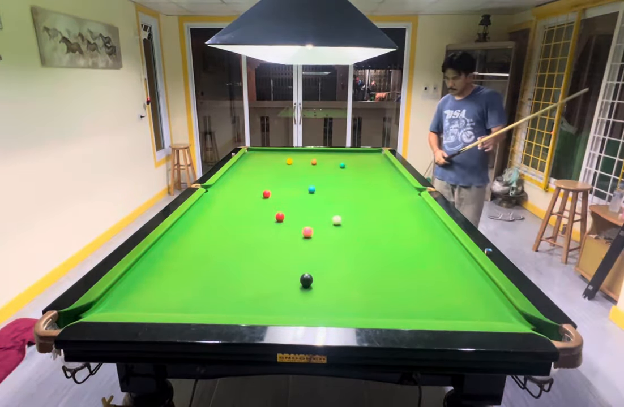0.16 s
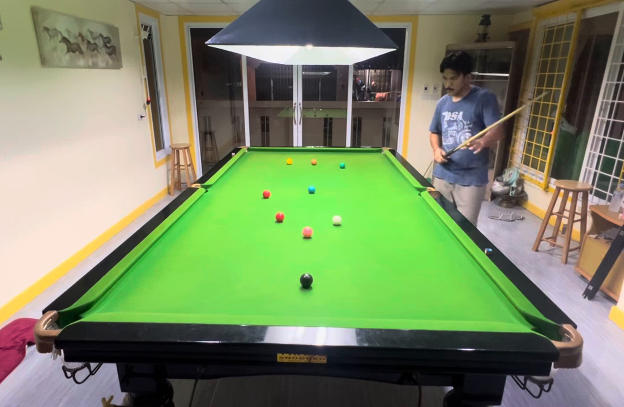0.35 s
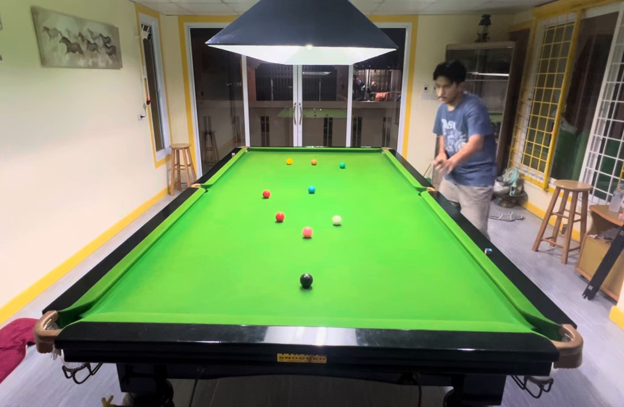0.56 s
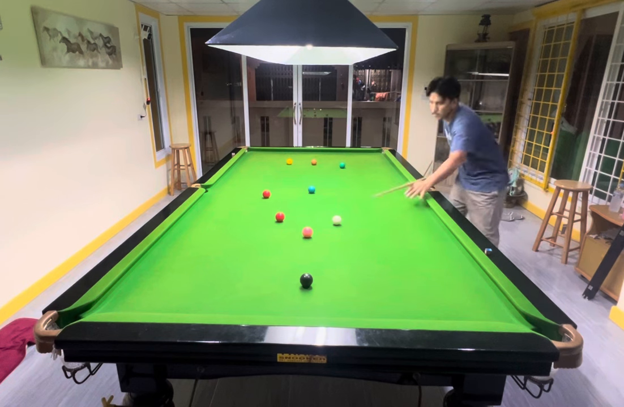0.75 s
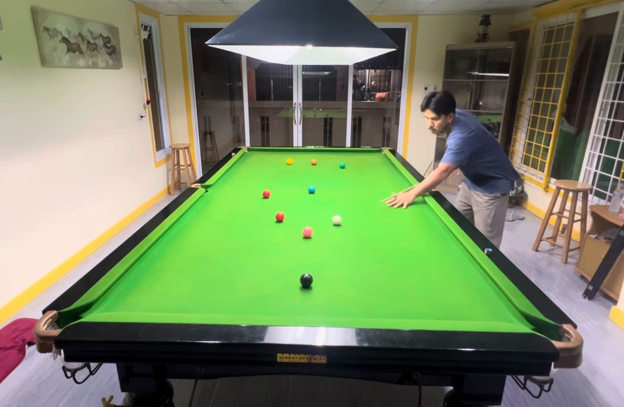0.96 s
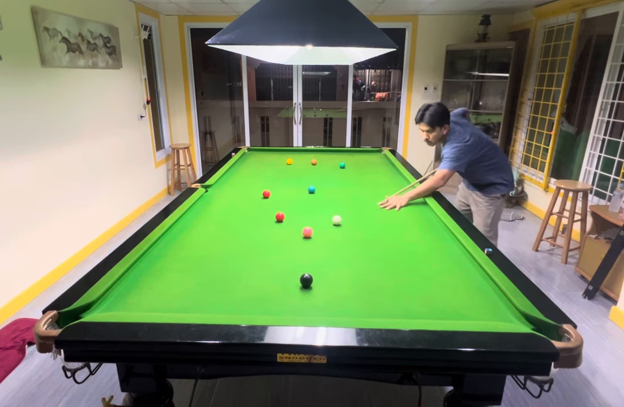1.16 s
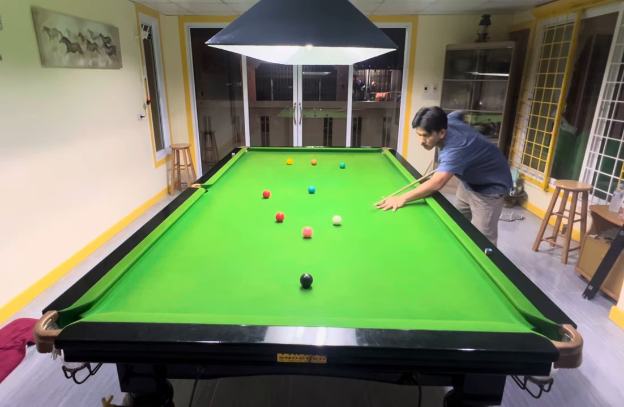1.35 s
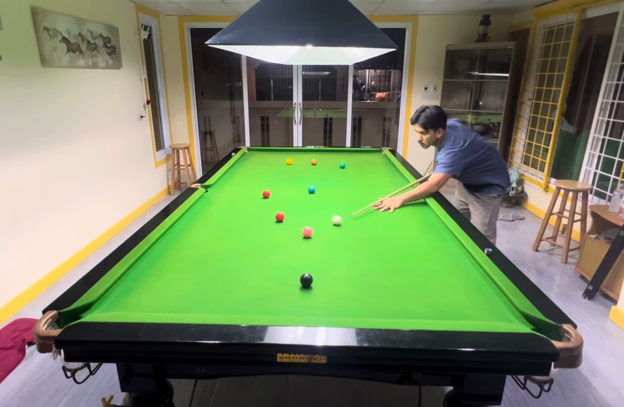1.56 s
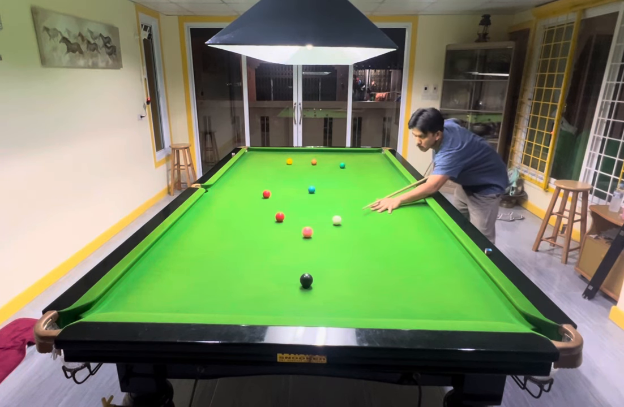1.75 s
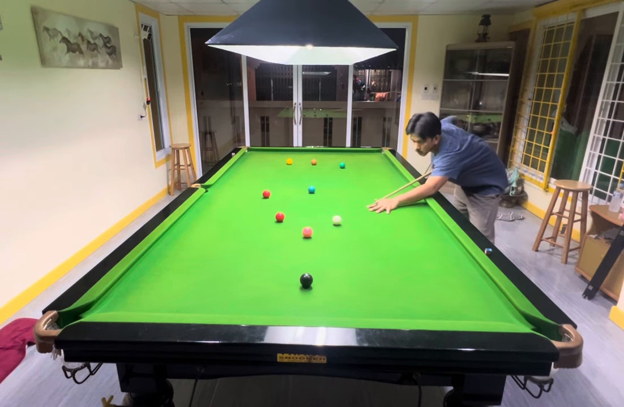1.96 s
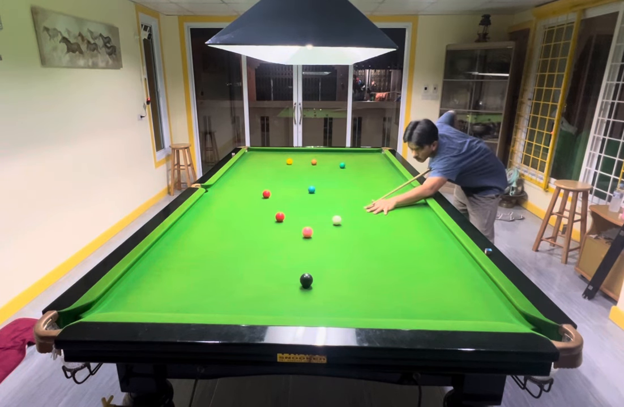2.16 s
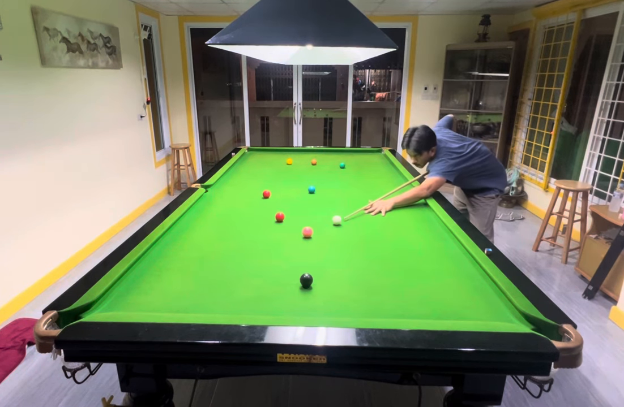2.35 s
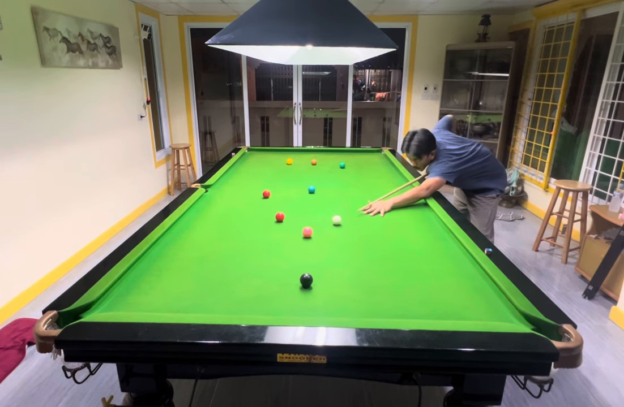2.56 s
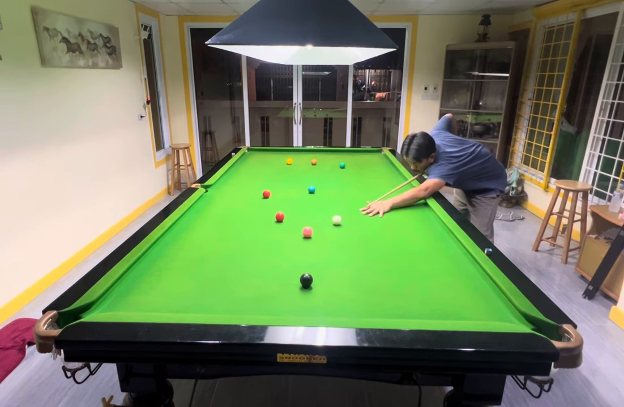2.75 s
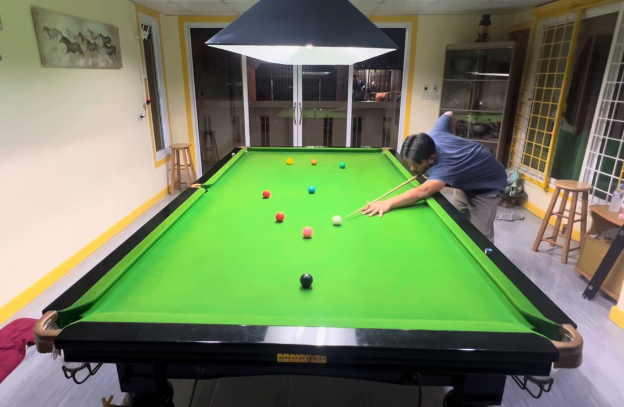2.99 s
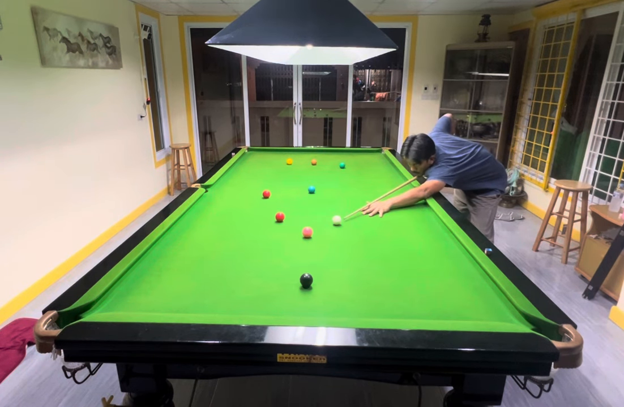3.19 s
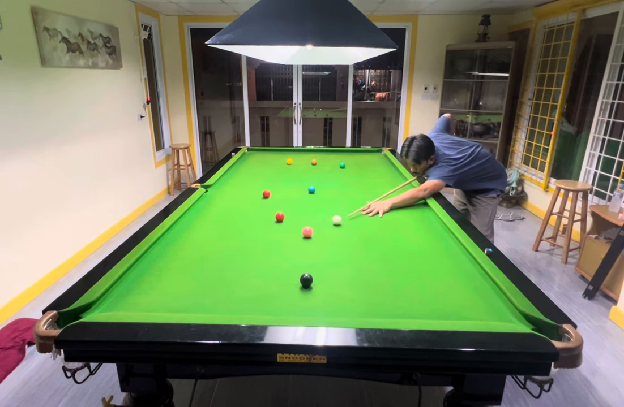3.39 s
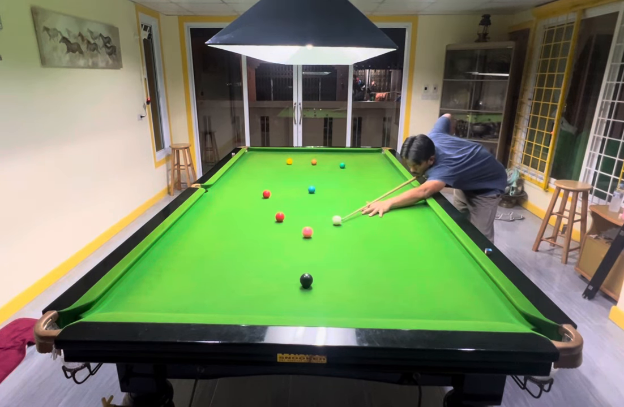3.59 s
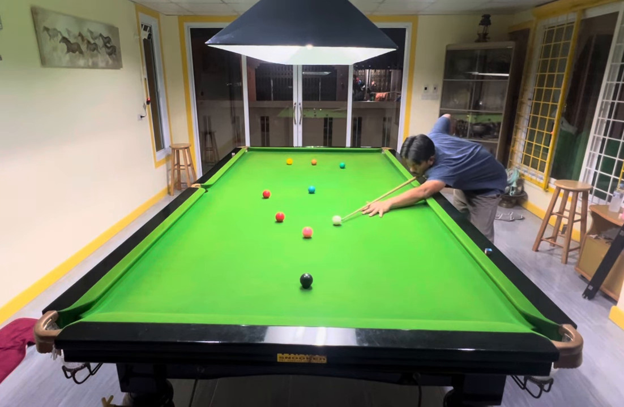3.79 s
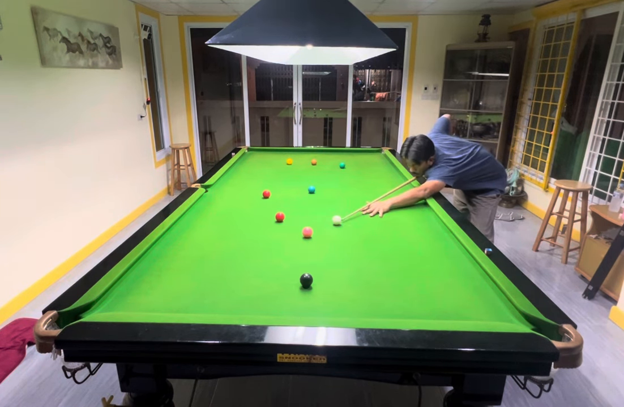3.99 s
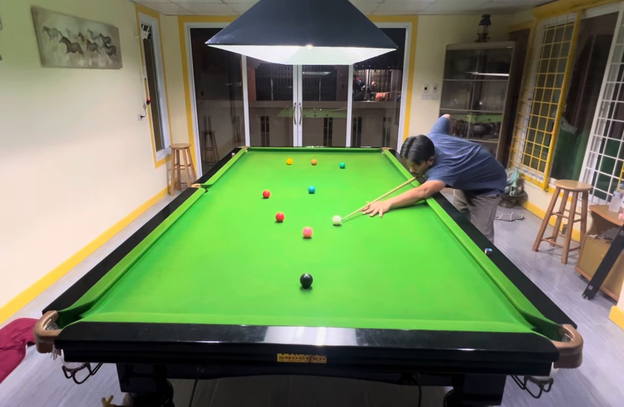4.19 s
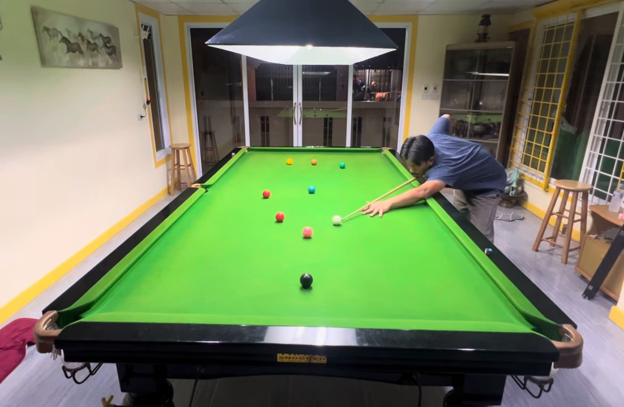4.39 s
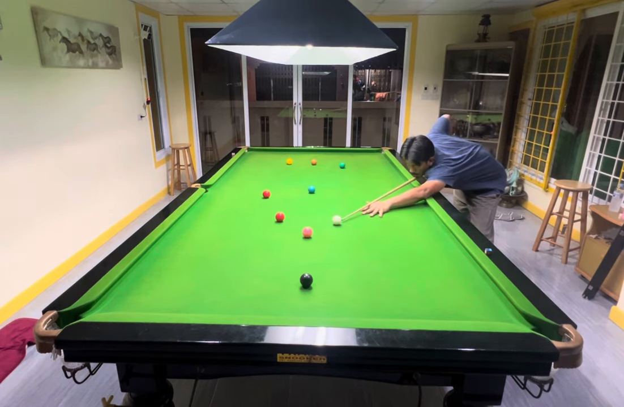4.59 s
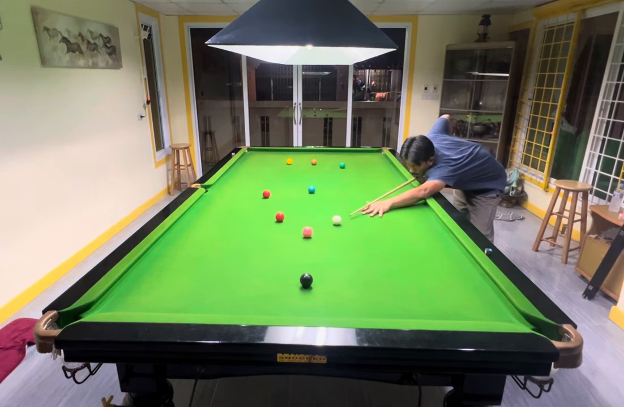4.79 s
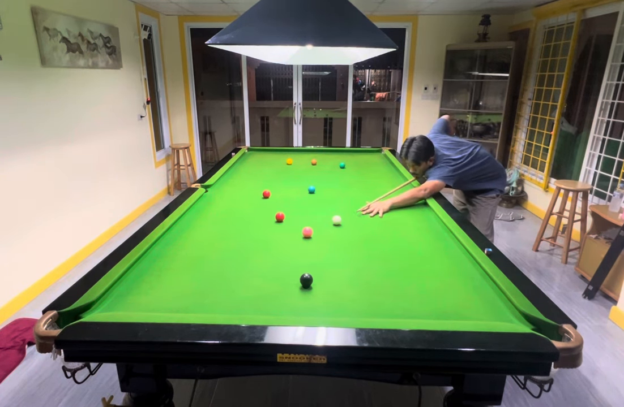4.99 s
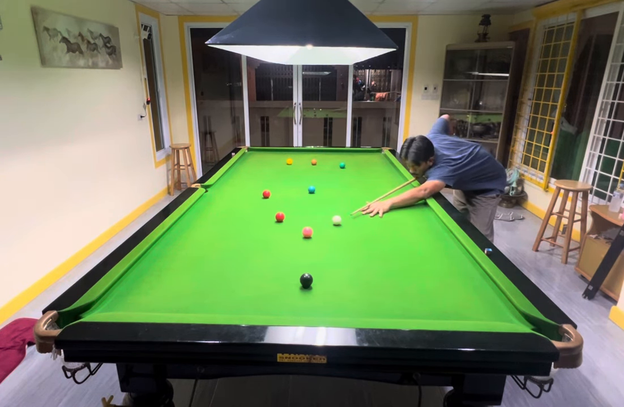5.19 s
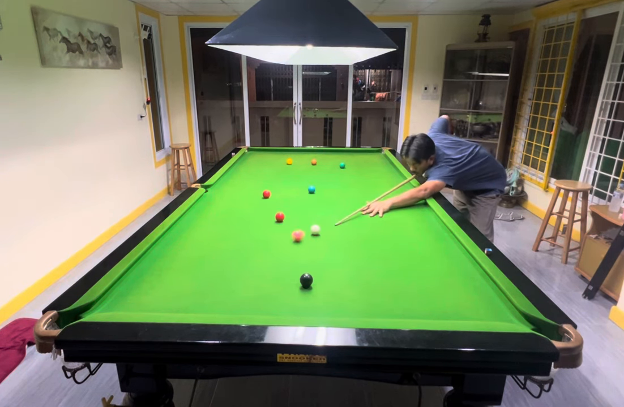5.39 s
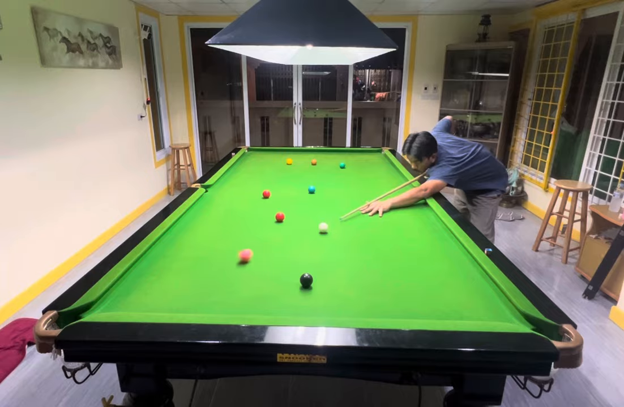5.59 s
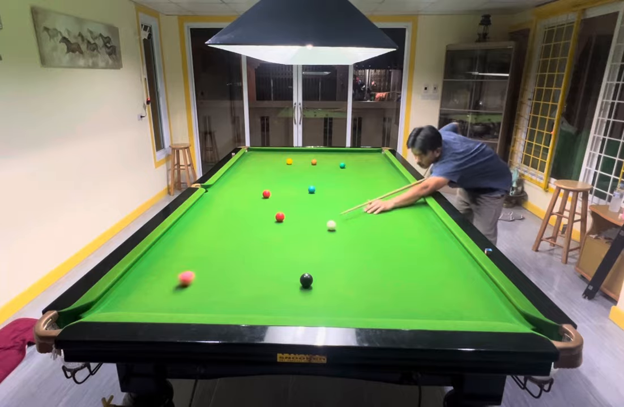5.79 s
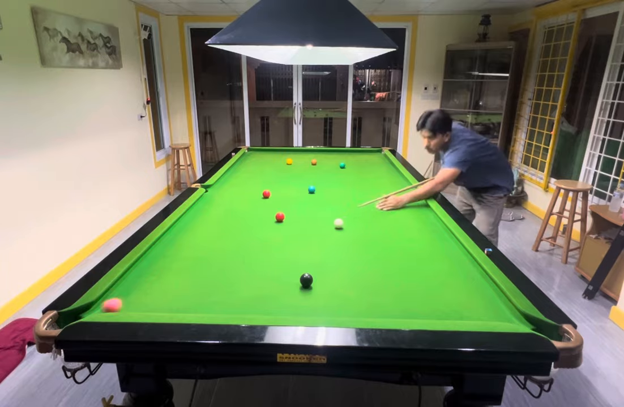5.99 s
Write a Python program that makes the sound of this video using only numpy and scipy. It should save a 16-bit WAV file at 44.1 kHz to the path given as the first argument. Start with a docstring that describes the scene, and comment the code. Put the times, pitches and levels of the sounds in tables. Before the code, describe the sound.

Throughout the six seconds or so, a cooling unit makes a quiet, steady low hum with a smooth rush of air. Its fan grazes the housing, giving faint, quick, uneven ticks, most noticeable in the first two seconds and again from about 3.3 to 5 seconds. A player's clothes rustle very faintly around 0.7, 1.4 and 2.1 seconds. At about 5.3 seconds a cue strikes the white ball with a soft, short wooden knock. A tenth of a second later that ball hits another with a single sharp, bright click, by far the loudest sound, slightly left of centre. The stereo microphone picks up quick echoes from the hard walls of the billiard room and a tail that dies away in a little over half a second. Another faint clothing rustle comes near 6 seconds as the hum continues.

```python
"""A cue strikes the white ball, which clicks against another ball, in a hard-walled billiard room.
Each blow is a short pressure pulse, and the wooden shaft rings after the first. Both reach the stereo
microphone directly, then as early echoes and a diffuse tail. In the background a cooling unit hums
(rotor orders, mains buzz) and blows air, its fan grazing the housing once a turn, now and then firmly
enough to tick. A faint treble rustle comes and goes as the player moves."""
import sys
import numpy as np
from scipy import signal
from scipy.fft import rfft, irfft
from scipy.io import wavfile
from scipy.ndimage import uniform_filter1d

SR = 44100
rng = np.random.default_rng(int(sys.argv[2]) if len(sys.argv) > 2 else 0)


def store_pcm(level_fs):
    """Save levels as 16-bit WAV."""
    pcm = np.round(np.clip(level_fs, -1, 1) * 32767).astype(np.int16)
    wavfile.write(sys.argv[1], SR, np.atleast_2d(pcm).T)


N = 266584
SECONDS, FREQS = np.arange(N) / SR, np.fft.rfftfreq(N, 1 / SR)
SPLIT = np.array([[.5], [-.5]])   # shares a left-minus-right amount between the two sides
TAIL_DB = -26.8   # gain of the room's tail


def cue_strike():
    """The leather tip hits the white ball; the shaft knocks on the bridge hand, rings and shudders."""
    # the blow: t/s, level/dB, left minus right/dB, right lag/ms
    strike = (5.2695, -27, -2.0, .03)
    # its spectrum: f/Hz, level/dB
    colour = [(150, -38), (300, -11), (600, -11), (900, -6), (1400, -1.0), (2300, 0.0), (3300, -4),
              (5200, -13), (7500, -20), (10000, -35), (13500, -48), (15300, -30)]
    start, peak_db, pan_db, lag_ms = strike
    tip = pulse(start, peak_db, colour, width_ms=1.5)
    knock = pulse(start + .003, peak_db=-21, colour=colour, width_ms=.8)
    shudder_db, shudder_t60_s, rise_s = -25.5, .055, .003
    age = np.maximum(SECONDS - start, 0)
    envelope = np.minimum(age / rise_s, 1) * from_db(shudder_db - 60 * age / shudder_t60_s)
    shudder = envelope * rms_one(stereo_noise(from_db(at_hz(colour, FREQS)), N)[0])
    sound = tip + knock + shaft_ring(start - .0008) + shudder
    return at_microphone(sound, pan_db, lag_ms, TAIL_DB + 3)


def shaft_ring(start):
    """The wooden shaft rings briefly; a thin rod radiates no bass, and the leather softens the top."""
    # shaft modes: f/Hz, level/dB, t60/s
    modes = [(350, -29.5, .016), (690, -40, .014), (950, -23, .0065), (1310, -33, .02), (1620, -34, .02),
             (2300, -32, .015)]
    click = np.zeros(N)
    click[round(start * SR)] = 1
    ringing = sum(from_db(level_db) * ring(click, hz, t60) for hz, level_db, t60 in modes)
    return signal.sosfilt(signal.butter(2, [200, 2200], "band", fs=SR, output="sos"), ringing)


def ball_click():
    """Two hard balls meet and send out one short, bright pulse."""
    # the collision: t/s, level/dB, left minus right/dB, right lag/ms
    collision = (5.3586, -2.0, 2.5, .045)
    # its spectrum: f/Hz, level/dB
    colour = [(200, -40), (500, -23), (850, -15), (1400, -6), (1900, -3.6), (2630, 0.0), (3600, -8),
              (5200, -21), (6100, -39), (9000, -46), (13000, -62), (15300, -46)]
    start, peak_db, pan_db, lag_ms = collision
    return at_microphone(pulse(start, peak_db, colour, width_ms=.8), pan_db, lag_ms, TAIL_DB)


def pulse(centre_s, peak_db, colour, width_ms):
    """One short symmetric pressure pulse: push, rarefaction, push."""
    shape = irfft(from_db(at_hz(colour, FREQS)), N)
    from_centre_ms = 1000 * np.minimum(SECONDS, N / SR - SECONDS)
    shape = -shape / shape[0] * np.exp(-.5 * (from_centre_ms / width_ms) ** 2)
    return irfft(rfft(shape) * arrivals([centre_s * 1000], [from_db(peak_db)], N), N)


def at_microphone(sound, pan_db, lag_ms, tail_db):
    """A blow on the table arrives directly (later on the right) and through the room."""
    right = irfft(rfft(sound) * arrivals([lag_ms], [1], N), N)
    return np.array([sound, right]) * from_db(pan_db * SPLIT) + room(sound, tail_db)


def room(sound, tail_db):
    """Hard walls return first echoes, then a diffuse tail that builds up and dies band by band."""
    # echoes off cushion, lamp shade, ceiling and walls: delay/ms, left/dB, right/dB, right lag/ms
    echoes = [(1.8, -15, -20, .3), (7.9, -2.0, -3.5, .3), (9.3, -6.5, -8, .4), (12.1, -10, -8, .05),
              (19.6, -12, -7, .05), (22.6, -7, -8, .3), (25.4, -8, -10, -.8)]
    # reverberation time: f/Hz, t60/s
    decay = [(200, .45), (500, .5), (1000, .62), (2000, .7), (4000, .6), (8000, .38), (15000, .25)]
    # lean of the tail: f/Hz, left minus right/dB
    balance = [(300, -1.0), (1000, .5), (2500, 0.0), (4000, 3.5), (8000, 1.5)]
    build_s, clump_db, clump_s, merge_s = .008, 4, .0015, .08
    t, hz = np.arange(SR) / SR, np.fft.rfftfreq(SR, 1 / SR)
    ms, left_db, right_db, lag = np.transpose(echoes)
    early = irfft([arrivals(ms, from_db(left_db), SR), arrivals(ms + lag, from_db(right_db), SR)], SR)
    lean = from_db(at_hz(balance, hz) * SPLIT)
    tail = 0
    for centre in 125 * 2. ** np.arange(8):
        octave = np.clip(1 - abs(np.log2((hz + 1) / centre)), 0, 1) ** .5
        tail += stereo_noise(octave * lean, SR) * from_db(-60 * t / at_hz(decay, centre))
    tail *= from_db(tail_db) * (1 - np.exp(-t / build_s))
    # young reflections arrive in clumps; later ones merge
    clumps = flutter((2, SR), clump_s)
    depth_db = clump_db * np.exp(-t / merge_s)
    tail *= from_db(depth_db * clumps - depth_db ** 2 * np.log(10) / 20)   # same mean power
    return signal.fftconvolve(sound[None], early + tail)[:, :N]


def fan_ticks():
    """A blade grazes the housing once a turn and rebounds, striking each mode with its own strength."""
    # firm touches: turn number (a fraction comes late), level/dB
    firm_touches = [(0, -49), (1, -52), (3, -53), (4, -47), (5, -48), (6, -50), (7, -52), (8, -48),
                    (9, -52), (11, -54), (12, -48), (15, -51), (16, -51), (21, -53), (22, -53), (30, -49),
                    (31, -53), (33, -53), (34, -50), (35, -48), (36, -50), (37, -51), (38.26, -50),
                    (40, -48), (42, -51), (44, -50), (46, -49)]
    # housing modes: f/Hz, level/dB, t60/s
    modes = [(715, -7.5, .04), (1210, -5, .028), (1430, 1.5, .03), (1560, -4, .024), (1940, -13, .02),
             (2085, -9, .025), (2420, -8, .018), (3000, -14, .012)]
    turn_s, first_s, jitter_s = .10701, .1166, .0006
    graze_db, spread_db, rebound_s, rebound_db, soft_hz = -59, 3.5, .006, -2.5, 2500
    turns = np.arange(int((N / SR - first_s) / turn_s))
    chance = rng.standard_normal((len(turns), 2 + 2 * len(modes)))
    touches = first_s + turn_s * turns + jitter_s * chance[:, 0]
    touch_db = graze_db + spread_db * chance[:, 1]
    for turn, firm_db in firm_touches:
        touch_db[round(turn)] = firm_db
        touches[round(turn)] += turn_s * (turn - round(turn))
    rebounds = touches + rebound_s * rng.uniform(.4, 1.6, len(turns))
    housing = np.zeros(N)
    for k, (hz, mode_db, t60) in enumerate(modes):
        clicks, level_db = np.zeros(N), touch_db + mode_db
        clicks[(touches * SR).astype(int)] = from_db(level_db + 1.8 * chance[:, 2 + 2 * k])
        clicks[(rebounds * SR).astype(int)] = from_db(level_db + rebound_db + 3 * chance[:, 3 + 2 * k])
        housing += ring(clicks, hz, t60)
    ticks = signal.sosfilt(signal.butter(2, soft_hz, fs=SR, output="sos"), housing)
    return ticks * from_db(-3 * SPLIT) + from_db(-2.5) * room(ticks, TAIL_DB - 9.5)


def cooler_hum():
    """Steady tones of rotor and mains, where neighbours beat slowly, and a thin motor whine."""
    # hum tones, the sum tone last: rotor order, buzz order, left rms/dB, right rms/dB, right lead/rad
    tones = [(1, 0, -60, -58, .2), (2, 0, -50, -50, .1), (3, 0, -61, -59, .1), (4, 0, -59, -61, .4),
             (0, 1, -59, -60, -.2), (1, 1, -53, -49, .45)]
    # motor whine: f/Hz, rms level/dB
    whine = [(2751, -87), (2832, -86), (2891, -87), (3047, -86)]
    rotor_hz, buzz_hz, rotor_rad, buzz_rad = 48.29, 100.06, .45, -.85
    out = 0
    for rotor, buzz, left_db, right_db, lead in tones:
        hz = rotor * rotor_hz + buzz * buzz_hz
        phase = (buzz_rad if buzz else rotor_rad) - lead * SPLIT
        out += from_db([[left_db], [right_db]]) * np.cos(2 * np.pi * hz * SECONDS + phase)
    for hz, level_db in whine:
        out += from_db(level_db) * np.cos(2 * np.pi * (hz * SECONDS + rng.random((2, 1))))
    return np.sqrt(2) * out


def cooler_air():
    """The unit blows smooth noise, coloured by two low room modes and broader peaks above."""
    # airflow spectrum: f/Hz, relative level/dB
    colour = [(18, -28), (30, -9), (70, .5), (210, -3), (380, -5.5), (500, -11), (700, -12), (1000, -10.5),
              (1300, -13.5), (2100, -16.5), (3000, -26), (5000, -32), (8500, -31.5), (9800, -49),
              (12200, -50), (13500, -74)]
    # its lean: f/Hz, left minus right/dB
    balance = [(60, 0.0), (160, -2.5), (260, -1.0), (680, -2.0), (1150, 3.5), (1800, 6), (2920, 2.5),
               (4740, 6), (9000, 2.0)]
    # two low room modes, then broader peaks: f/Hz, width/Hz, left boost/dB, right boost/dB
    resonances = [(245, 50, 3, 3), (345, 30, 3, 2.0), (720, 80, 1.0, 2.5), (1640, 260, 6, 1.5),
                  (4350, 400, 6, 3), (5600, 600, 3, 2.0), (6500, 1200, 3.5, 2.5), (7480, 350, 6, 3.5)]
    rms_db = -51
    level_db = at_hz(colour, FREQS) + at_hz(balance, FREQS) * SPLIT
    for centre, width, left_db, right_db in resonances:
        level_db += np.exp(-.5 * (2 * (FREQS - centre) / width) ** 2) * [[left_db], [right_db]]
    return from_db(rms_db) * rms_one(stereo_noise(from_db(level_db), N))


def cloth_rustle():
    """The player's clothes crumple unevenly: bright noise that swells with each movement."""
    # movements: crest t/s, level/dB, half width/s
    movements = [(.65, -66, .33), (1.4, -69, .3), (2.1, -72, .4), (6.0, -61, .17)]
    # cloth spectrum: f/Hz, relative level/dB
    colour = [(1500, -7), (3400, 2.5), (5000, -7), (8500, -4), (10500, -16), (14000, -32)]
    rest_db, crumple_db = -81, 1.0
    noise = rms_one(stereo_noise(from_db(at_hz(colour, FREQS)), N))
    swells = sum(from_db(db) * np.exp(-((SECONDS - s) / width) ** 2) for s, db, width in movements)
    return noise * (from_db(rest_db) + swells) * from_db(crumple_db * flutter(N, smooth_s=.03))


def stereo_noise(gain, size):
    """Noise of a given spectrum whose two sides are as alike as a diffuse field makes them."""
    # likeness of the microphone's two sides: f/Hz, correlation
    likeness = [(60, 0.98), (110, 0.94), (210, 0.73), (390, 0.09), (730, -0.14), (1360, 0.17), (2540, 0.11),
                (4740, -0.05)]
    alike = at_hz(likeness, np.fft.rfftfreq(size, 1 / SR))
    mid, side = rfft(rng.standard_normal((2, size)))
    return irfft(gain * (np.sqrt(1 + alike) * mid + np.sqrt(1 - alike) * side * [[1], [-1]]), size)


def ring(clicks, hz, t60):
    """A unit click sets a sine of height 1 ringing."""
    r, w = from_db(-60 / (t60 * SR)), 2 * np.pi * hz / SR
    return signal.lfilter([0, np.sin(w)], [1, -2 * r * np.cos(w), r * r], clicks + 1e-18)


def arrivals(delays_ms, gains, size):
    """Clicks at fractional delays, as a spectrum."""
    hz = np.fft.rfftfreq(size, 1 / SR)
    return sum(gain * np.exp(-2j * np.pi * hz * ms / 1000) for ms, gain in zip(delays_ms, gains))


def flutter(shape, smooth_s):
    """Smoothed random wavering of unit rms."""
    return rms_one(uniform_filter1d(rng.standard_normal(shape), int(smooth_s * SR)))


def at_hz(points, hz):
    """Read a table on a log-frequency axis."""
    knots_hz, values = np.transpose(points)
    return np.interp(np.log(hz + 1), np.log(knots_hz + 1), values)


def from_db(db):
    """Decibels to gain."""
    return 10 ** (np.asarray(db) / 20)


def rms_one(x):
    """Scale to unit rms."""
    return x / np.sqrt(np.mean(x ** 2) + 1e-20)


def scene():
    """The shot on the table, with the cooling unit and the player behind it."""
    ticks = fan_ticks()
    shot = cue_strike() + ball_click()
    return shot + ticks + cooler_hum() + cooler_air() + cloth_rustle()


def record(dry):
    """A steep low-pass cuts the top, 70 dB down from 16.3 kHz."""
    return signal.sosfilt(signal.cheby2(12, 70, 16300, fs=SR, output="sos"), dry)


dry = scene()
out = record(dry)
store_pcm(out)
```